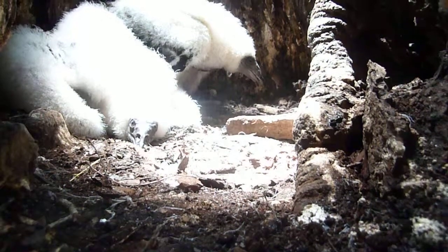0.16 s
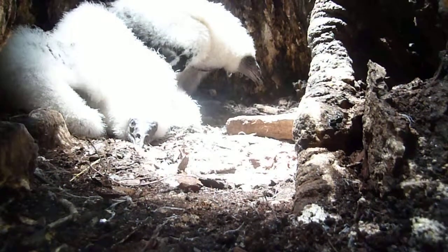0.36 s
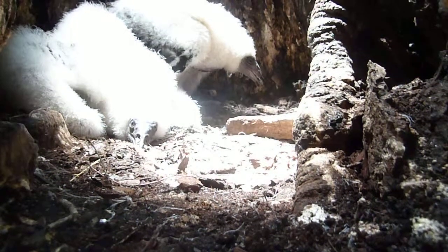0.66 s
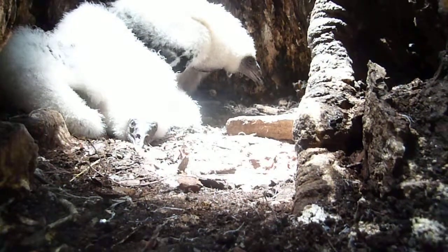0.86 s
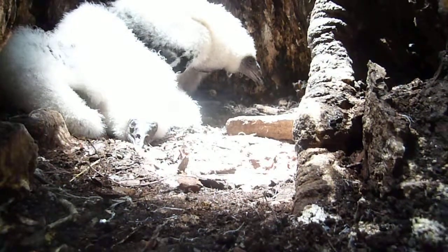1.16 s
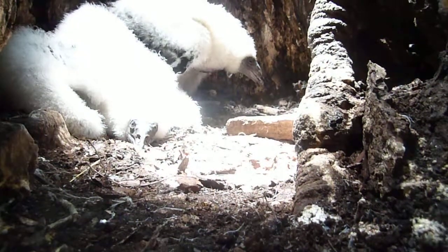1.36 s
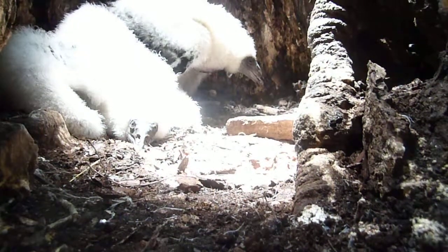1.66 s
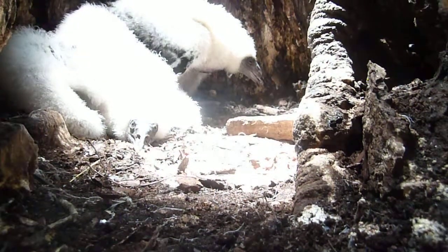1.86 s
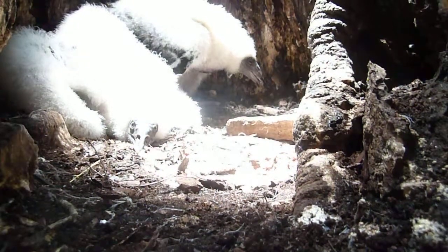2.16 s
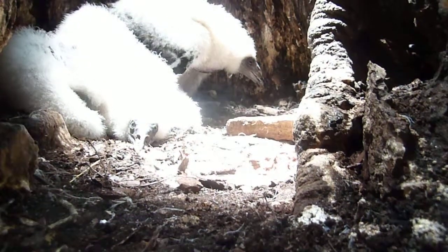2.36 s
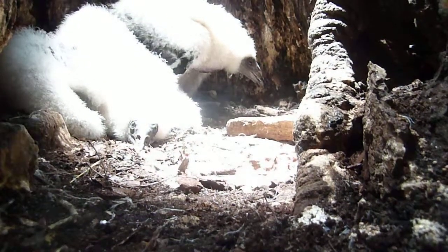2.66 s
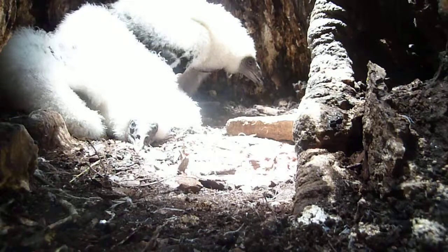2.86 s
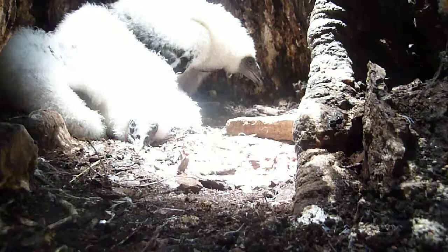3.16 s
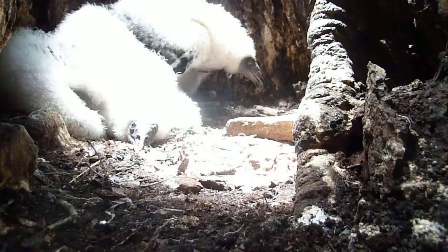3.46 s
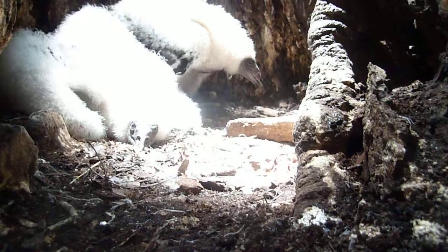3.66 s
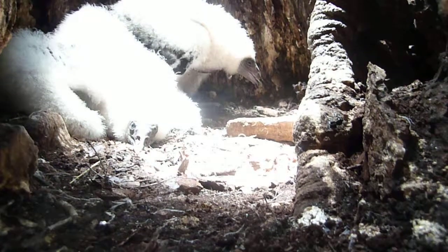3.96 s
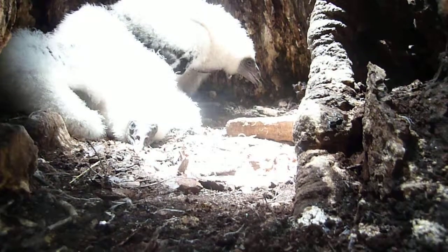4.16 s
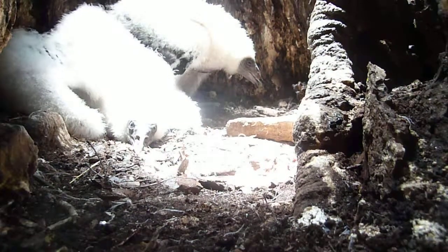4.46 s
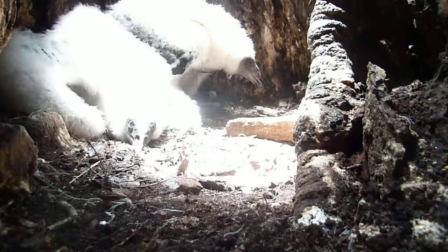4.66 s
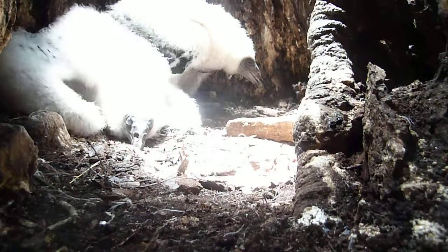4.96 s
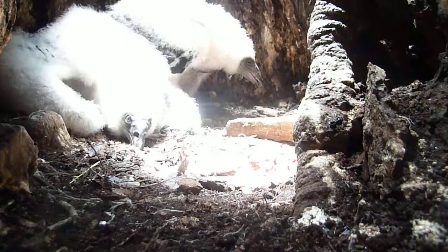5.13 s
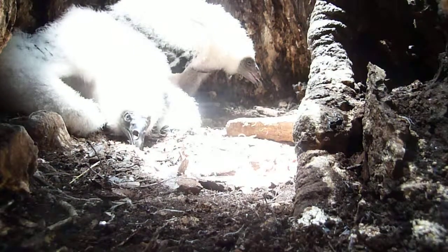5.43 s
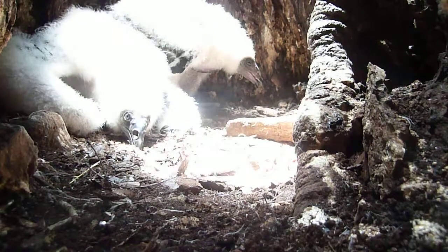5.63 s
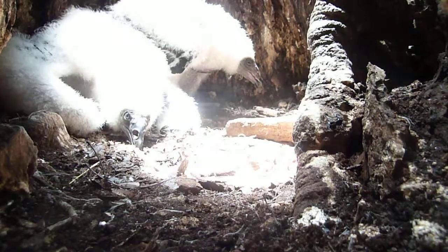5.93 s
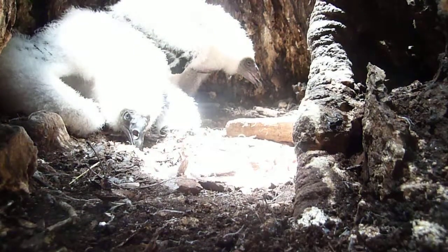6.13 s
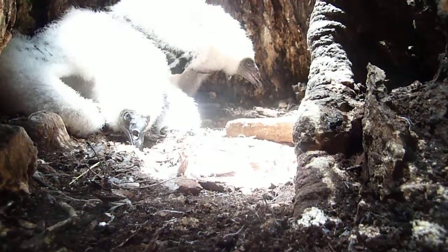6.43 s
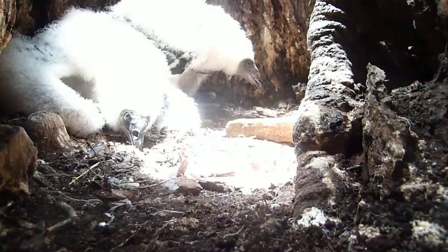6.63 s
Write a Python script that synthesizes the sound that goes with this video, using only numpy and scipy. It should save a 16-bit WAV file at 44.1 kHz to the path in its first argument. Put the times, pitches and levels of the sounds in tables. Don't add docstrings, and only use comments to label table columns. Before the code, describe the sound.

Inside a hollow tree, dull thumps and dry clicks give way to a young bird's breathy, chesty hiss that keeps growing louder.

```python
import sys
import numpy as np
from scipy import signal
from scipy.fft import rfft, irfft, next_fast_len
from scipy.io import wavfile
from scipy.ndimage import uniform_filter1d, map_coordinates

SR = 44100
rng = np.random.default_rng(int(sys.argv[2]) if len(sys.argv) > 2 else 0)


def persist_wave(psi):
    counts = np.round(np.clip(psi, -1, 1) * 32767).astype(np.int16)
    wavfile.write(sys.argv[1], SR, np.atleast_2d(counts).T)


def gain_from_db(level_db):
    decades = np.asarray(level_db, float) / 20
    return 10 ** decades


N = 299428


def unit(x):
    return x / np.sqrt(np.mean(x ** 2) + 1e-20)


def along(points, hz):
    f, value = np.transpose(points)
    return np.interp(np.log(hz + 1), np.log(f + 1), value)


def wobble(rate):
    knots = rng.standard_normal(int(N * rate / SR) + 4)
    return map_coordinates(knots, [np.arange(N) * rate / SR])


def filtered(x, response):
    m = next_fast_len(N + SR // 2)
    return irfft(rfft(x, m) * response(np.fft.rfftfreq(m, 1 / SR)), m)[:N]


def causal(gain):
    cepstrum = irfft(np.log(gain + 1e-6))
    half = len(cepstrum) // 2
    cepstrum[1:half] *= 2
    cepstrum[half + 1:] = 0
    return np.exp(rfft(cepstrum))[:len(gain)]


def patchy(depth_db):
    z = signal.stft(rng.standard_normal(N + 512), nperseg=512)[2]
    field = uniform_filter1d(rng.standard_normal(z.shape), size=5, axis=0)
    field = uniform_filter1d(field, size=10, axis=1)
    return unit(signal.istft(z * gain_from_db(depth_db * unit(field)), nperseg=512)[1][:N])


def resonate(x, peaks):
    def one_pass(f):
        total = 0
        for k, (centre, width, db) in enumerate(peaks):
            peak = 1j * f * width / (centre * centre - f * f + 1j * f * width)
            total = total + (-1) ** k * gain_from_db(db / 2) * peak
        return total
    return unit(filtered(x, lambda f: one_pass(f) ** 2))


def ring(modes, rise):
    t = np.arange(SR // 2) / SR
    total = np.zeros(len(t))
    for hz, db, t60 in modes:
        swell = 1 - np.exp(-t * hz / rise)
        total += swell * gain_from_db(db - 60 * t / abs(t60)) * np.sin(2 * np.pi * hz * t)
    return total


def add(track, s, sound):
    track[round(s * SR):][:len(sound)] += sound


def echoes(x, t60):
    t = np.arange(SR // 2) / SR
    tail = rng.standard_normal(len(t)) * gain_from_db(-60 * t / t60)
    return signal.fftconvolve(x, tail / np.linalg.norm(tail))[:N]


def hush():
    # f/Hz, density/dB
    spectrum = [(15, -46), (50, 0.5), (500, -6), (1600, -12.5), (3200, -15), (5000, -20.5), (6300, -28.5),
                (7800, -24.5)]
    level_db = -34.5 + 0.14 * wobble(1.9)
    return gain_from_db(level_db) * filtered(patchy(1.7), lambda hz: gain_from_db(along(spectrum, hz)))


def whistle(flips, slurs, waver):
    rise_from_hz, rise_bow = 2350, .72
    drop_to_hz, drop_s, fade_db_per_s = 1950, .048, 90
    glide_share = .7
    best_hz, thin_db_per_octave = 3100, 18
    edge_s = .007
    t = np.arange(N) / SR
    pitch, gain = np.full(N, drop_to_hz, float), np.zeros(N)
    for apex, top_hz, rise, drop, db in flips:
        on = (t >= apex - rise) & (t < apex + drop_s)
        u = t[on] - apex
        up = rise_from_hz + (top_hz - rise_from_hz) * abs(1 + u / rise) ** rise_bow
        down = drop_to_hz + (top_hz - drop_to_hz) / (1 + abs(u) / drop)
        pitch[on] = np.where(u < 0, up, down)
        gain[on] = gain_from_db(db - fade_db_per_s * np.maximum(u, 0))
    for s, length, from_hz, to_hz, db in slurs:
        on = (t >= s) & (t < s + length)
        progress = np.minimum((t[on] - s) / (glide_share * length), 1)
        pitch[on] = from_hz + (to_hz - from_hz) * np.sin(np.pi / 2 * progress) ** 2
        gain[on] = gain_from_db(db)
    pitch = np.interp(t, t[gain > 0], pitch[gain > 0])
    pitch = uniform_filter1d(pitch, size=120) * (1 + waver * wobble(120))
    thinning_db = thin_db_per_octave * abs(np.log2(pitch / best_hz))
    gain = uniform_filter1d(gain, round(edge_s * SR)) * gain_from_db(2.4 * wobble(60) - thinning_db)
    return np.sqrt(2) * gain * np.sin(2 * np.pi * np.cumsum(pitch) / SR)


def songbird():
    # apex t/s, apex f/Hz, rise/s, drop time/s, level/dB
    near_flips = [
        (1.378, 3800, .027, .0045, -42),
        (1.629, 3850, .047, .004, -40.5),
        (2.9, 3800, .002, .008, -50),
    ]
    far_flips = [
        (.882, 4600, .04, .014, -54),
        (1.046, 4700, .002, .017, -53),
        (1.112, 3450, .016, .015, -57),
        (2.222, 4300, .025, .035, -59),
        (2.395, 3300, .035, .06, -59),
    ]
    # start t/s, length/s, from f/Hz, to f/Hz, level/dB
    near_slurs = [(1.322, .032, 3350, 3060, -45), (1.455, .05, 2050, 2330, -42),
                  (1.545, .038, 2520, 2300, -41), (2.845, .03, 3220, 3190, -44),
                  (2.912, .068, 2830, 2230, -41), (2.968, .022, 2330, 2420, -43),
                  (3.03, .023, 2600, 2630, -40), (3.053, .031, 2650, 3210, -38),
                  (3.084, .026, 3210, 2340, -42), (3.11, .032, 2340, 3150, -40),
                  (3.142, .012, 3150, 3480, -44)]
    far_slurs = [
        (0.929, .035, 2400, 2350, -55),
        (.98, .03, 2150, 2500, -64),
        (1.13, .03, 3250, 3300, -61),
        (2.27, .06, 3100, 2560, -57),
    ]
    near = whistle(near_flips, near_slurs, waver=.005)
    far = whistle(far_flips, far_slurs, waver=.03)
    near_wet = gain_from_db(-6) * echoes(near, t60=0.92)
    far_wet = gain_from_db(1.5) * echoes(far, t60=0.76)
    return near + near_wet + far + far_wet


def snaps():
    # t/s, peak level/dB, centre f/Hz,
    # length/s
    cracks = [(.393, -30, 1600, .007), (.6795, -25, 1000, .005), (1.11, -27, 1600, .005),
              (.711, -41, 1800, .003), (.982, -42, 1900, .003), (1.779, -38, 2200, .004),
              (1.788, -31, 1800, .008), (1.792, -39, 4200, .006), (1.819, -40, 1500, .003),
              (1.929, -45, 4500, .004), (1.942, -43, 3500, .005), (1.969, -28, 560, .011),
              (2.043, -42, 5600, .003), (2.0515, -30, 5200, .006), (2.0515, -31, 1500, .004),
              (2.056, -31, 4200, .005), (2.071, -45, 5000, .003), (2.089, -40, 2600, .005),
              (2.118, -39, 1500, .004), (2.882, -28, 1800, .004)]
    out, t = np.zeros(N + SR), np.arange(SR // 20) / SR
    for s, db, hz, length in cracks:
        band = signal.butter(2, [hz / 2.1, min(hz * 1.6, 9000)], "band", fs=SR)
        burst = unit(signal.lfilter(*band, rng.standard_normal(len(t))))
        add(out, s, gain_from_db(db - 4.5 - 20 * t / length) * burst)
    return out[:N]


def ticks():
    # t/s, peak level/dB
    strikes = [(0.182, -29.5), (0.3162, -32.5), (0.6534, -31.5), (0.7851, -28), (1.4541, -33),
               (1.5873, -27.5), (2.2542, -32), (2.386, -28), (2.522, -27.5), (2.7185, -32.5), (2.8516, -35),
               (3.2837, -41), (3.8546, -33.5), (3.9898, -27.5)]
    # f/Hz, level/dB, t60/s
    tick_modes = [
        [(860, -8.5, 0.024), (1045, -5.5, 0.029), (1238, -2.5, 0.062)],
        [(2035, 1.5, 0.02), (2550, -7, 0.014)],
        [(3300, -14, .014), (3810, -21, 0.023), (5000, -22.5, 0.016)],
    ]
    out, t = np.zeros(N + SR), np.arange(SR // 2) / SR
    low, upper, top = [ring(modes, rise=1.64) for modes in tick_modes]
    settle = gain_from_db(-8 * np.clip((t - .0065) / .0015, 0, 1))
    for s, db in strikes:
        top_db = 1.5 + 1.1 * (db + 31.5)
        tick = settle * (low + gain_from_db(-1) * upper + gain_from_db(top_db) * top)
        add(out, s - .0005, gain_from_db(db - 1.0) * tick)
        add(out, s + 0.002265, gain_from_db(db - 18) * tick)
    return out[:N] + gain_from_db(-12) * echoes(out[:N], t60=.06)


def knocks():
    # t/s, peak level/dB, cavity mode f/Hz, wall mode f/Hz, wall mode level/dB
    blows = [(0.3913, -13, 162.4, 429, 4.5), (.68, -11, 136, 446, -6), (.89, -40, 127, 200, -7),
             (1.111, -12, 132, 332, -0.5), (1.792, -32.5, 263, 405, 1.5), (1.935, -29.5, 133, 300, -5),
             (1.969, -36.5, 191, 261, 14), (1.9769, -34, 187, 273, 12.5), (1.993, -37, 152, 240, -10),
             (2.057, -33.5, 239, 337, -8), (2.266, -26, 149, 242, 0), (2.291, -36.5, 140, 217.4, -5),
             (2.33, -38, 131, 200, -10)]
    # f/Hz, level/dB, t60/s
    wood = [(205, 5, 0.073), (300, -5, 0.13), (543, -11.5, 0.067), (780, -17.5, 0.061), (910, -20.5, 0.068)]
    # f/Hz, level/dB, t60/s
    trunk = (59, -17, .38)
    ring_share = 0.5
    out, t = np.zeros(N + SR), np.arange(SR // 2) / SR
    for s, db, cavity_hz, wall_hz, wall_db in blows:
        modes = [(cavity_hz, 0, .17), (cavity_hz * .9, -12, .45), (cavity_hz * 1.18, -15, .4)]
        modes += [(wall_hz, wall_db, .09)]
        modes += [(hz, level + 0.87 * wall_db + rng.normal(), t60) for hz, level, t60 in wood]
        body = ring([(hz, level, t60 * ring_share) for hz, level, t60 in modes], rise=1.0)
        force_db = 0.24 * (db + 11.5)
        deep = gain_from_db(force_db) * ring([trunk], rise=1.0)
        contact = gain_from_db(force_db - 8) * np.exp(-((t - .0005) / .00025) ** 2)
        grit = np.convolve(rng.standard_normal(len(t)), np.hanning(14), "same")
        crack = gain_from_db(force_db - 28.5 - 60 * t / 0.022) * grit
        add(out, s, gain_from_db(db - 13.0) * (contact + crack))
        add(out, s + .0008, gain_from_db(db - 2.5) * (deep - body))
    return out[:N] + gain_from_db(-17) * echoes(out[:N], t60=.3)


def vocal_tract(make_air, shut, wide, gape):
    turn = gape * np.pi / 2
    closed = resonate(make_air(), shut)
    opened = resonate(make_air(), wide)
    return np.cos(turn) * closed + np.sin(turn) * opened


def hiss():
    # t/s, effort as jet level/dB
    breath = [
        (2.52, -69.5),
        (2.88, -57),
        (3.58, -48.5),
        (4.03, -46.5),
        (4.11, -43),
        (4.2, -45),
        (4.969, -39.5),
        (5.87, -38),
        (6.79, -37.5),
    ]
    # f/Hz, width/Hz, level/dB
    chest_shut = [(172.6, 94, -11.5), (324, 101, 3.5), (450, 122, -8.5)]
    chest_open = [(282.4, 130, -3.5), (420.3, 215.5, 0.5), (603.4, 237, -5)]
    throat_peaks = [(823, 170, 0), (1313, 454, 1.5)]
    pipe_shut = [(1878, 190, -1.5), (2260, 210, -3), (2773, 334, -3), (3580, 334, -0.5), (4115, 795, -7.5),
                 (4900, 330, -6), (5250, 370, -10.5), (6090, 1060, -11.5), (7500, 1200, -16.5)]
    pipe_open = [(1857, 310, -10), (2238, 470, -4.5), (2688, 460, -2), (3430, 600, -1.5),
                 (4208, 1050, -4.5), (4890, 890, -5), (5480, 630, -12), (5940, 470, -14),
                 (7370, 1600, -28.5)]
    t = np.arange(N) / SR
    s, effort_db = np.transpose(breath)
    jet_db = np.interp(t, s, effort_db)
    missing_db = -37 - jet_db

    rasp_db = -26.5 - 0.37 * missing_db - 0.006 * missing_db ** 2
    rasp_db -= 1.5 * np.maximum(t - 5.95, 0)
    rasp_db -= 0.3 * wobble(14)
    throat_db = -9 - 0.88 * missing_db + 0.039 * missing_db ** 2

    flutter = 0.88 * wobble(25) + 0.62 * wobble(70)
    chest_gape = np.clip((jet_db + 60) / (60 - 34.0), 0, 1)
    rasp = vocal_tract(lambda: gain_from_db(flutter) * patchy(0.82), chest_shut, chest_open, chest_gape)
    pushed = gain_from_db(0.58 * flutter + 1.9 * rasp + 0.25 * wobble(8))
    throat = resonate(pushed * patchy(0.3), throat_peaks)
    pipe_gape = np.clip((jet_db + 48) / (48 - 34.5), 0, 1)
    jet = vocal_tract(lambda: pushed * patchy(0.37), pipe_shut, pipe_open, pipe_gape)
    air = jet + gain_from_db(throat_db) * throat
    onset = np.clip((t - s[0]) / 0.014, 0, 1)
    return onset * (gain_from_db(rasp_db) * rasp + gain_from_db(jet_db + 7.5) * air)


def scene():
    return (hush() + songbird() + snaps() + ticks() + knocks() + hiss())[None]


def roll_off(x):
    return signal.sosfilt(signal.butter(12, 8940, fs=SR, output="sos"), x)


def record(dry):
    # f/Hz, gain/dB
    microphone = [(30, -6.5), (60, -5.5), (120, 2), (6300, 0.5), (7000, -10), (7500, -20), (7750, -28.5),
                  (7950, -63.5)]
    rate = 16000
    x = filtered(dry[0], lambda hz: causal(gain_from_db(along(microphone, hz)) * (hz < rate / 2)))
    folded = x * np.cos(2 * np.pi * rate * np.arange(N) / SR)
    mirror = filtered(folded, lambda hz: (hz > 8300) & (hz < 8930))
    return roll_off((x + gain_from_db(-16.5) * mirror)[None])


dry = scene()
out = record(dry)
persist_wave(out)
```